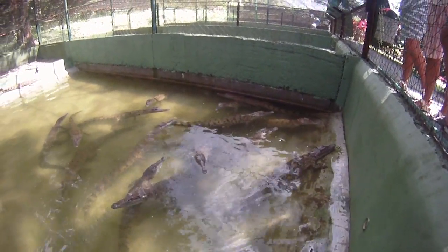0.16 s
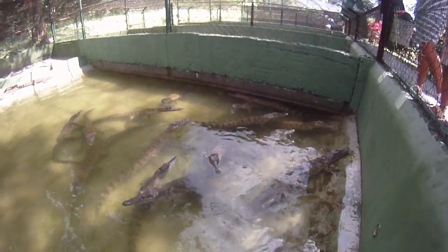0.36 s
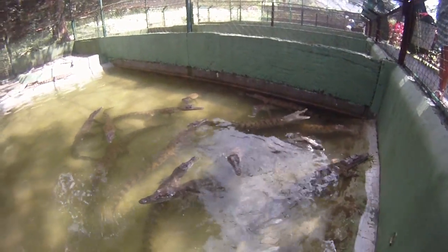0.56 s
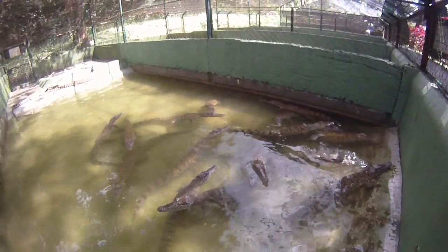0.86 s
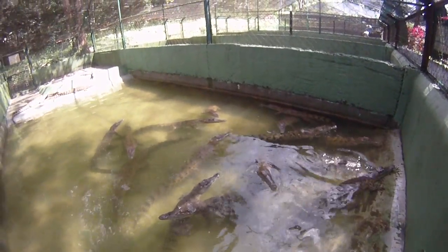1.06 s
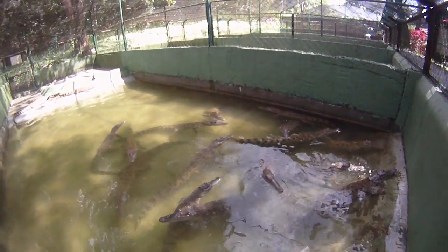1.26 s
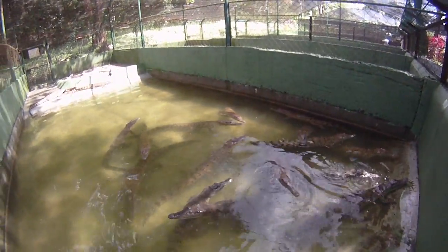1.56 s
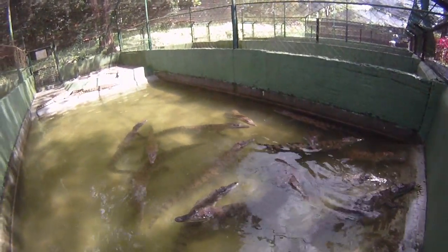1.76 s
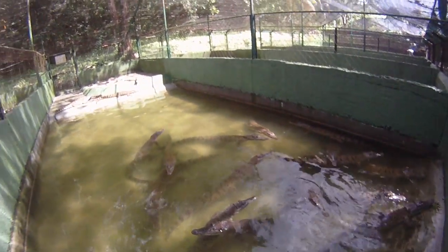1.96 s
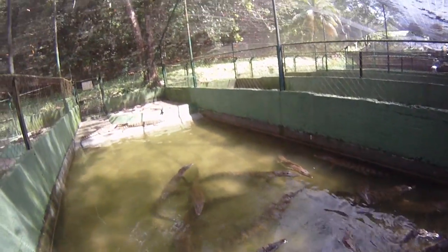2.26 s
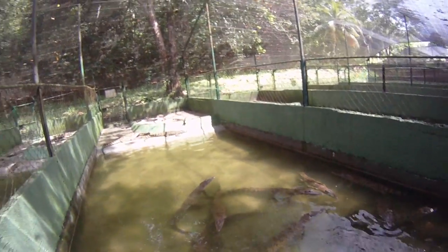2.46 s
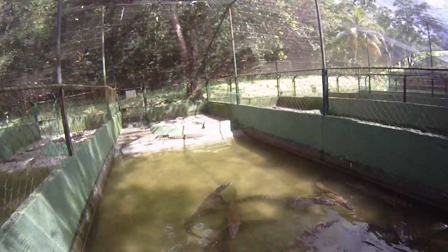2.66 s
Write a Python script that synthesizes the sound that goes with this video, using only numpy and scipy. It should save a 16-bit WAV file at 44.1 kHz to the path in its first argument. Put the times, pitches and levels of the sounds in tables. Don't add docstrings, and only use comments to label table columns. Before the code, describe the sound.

A sharp knock on a small plastic case with a low thump, over steady outdoor hiss

```python
import sys
import numpy as np
from scipy import signal
from scipy.fft import rfft, irfft, next_fast_len
from scipy.io import wavfile
from scipy.ndimage import map_coordinates

SR = 44100
rng = np.random.default_rng(int(sys.argv[2]) if len(sys.argv) > 2 else 0)


def how_loud(loudness_db):
    steps = np.asarray(loudness_db, float) / 20
    return 10 ** steps


def wrap_up_sound(samples):
    columns = np.atleast_2d(samples).T
    tamed = np.clip(columns, -1, 1)
    steps = np.round(tamed * 32767).astype(np.int16)
    wavfile.write(sys.argv[1], SR, steps)


N = 123479

# start_s, level_db, direction
PUSHES = [
    (.2426, -30.3, 1),
    (.2475, -31.6, -1),
    (.2693, -32.6, -1),
]
# start_s, level_db, centre_hz
CONTACTS = [(.2345, -39, 1950), (.2375, -33, 1950), (.2418, -22, 1250), (.2428, -15, 1880),
            (.2445, -31, 2800), (.2450, -39, 3600), (.2440, -44, 4650), (.2462, -21, 2150),
            (.2490, -28, 900), (.2552, -33, 2300), (.2632, -32, 1000), (.2662, -24, 1250),
            (.2672, -31, 2850), (.2680, -41, 4650), (.2685, -40, 3600), (.2694, -25, 1620),
            (.2726, -26, 2350), (.2772, -33, 1900), (.2810, -38, 2300)]
# pitch_hz, level_db, decay_s (to -60 dB), direction at the microphone
POLE_MODES = [(58.8, -3, .7, 1), (169.5, 1.8, .29, 1), (235.1, .8, .31, -1)]
# pitch_hz, level_db, decay_s (to -60 dB)
WALL_MODES = [(724.6, 4, 0.13), (870, 8, 0.14), (1138, 7, 0.052), (1420, -6, 0.041), (1580, -10, 0.044),
              (1727, 3, 0.074), (1983, 14.5, 0.021), (1990, -1, 0.029), (2270, -5, 0.059),
              (2574, 10.5, 0.032), (3750, 6, 0.02)]
# start_s, pitch_hz, level_db, decay_s (to -60 dB)
TICKS = [(.258, 292, -38, .07), (2.45, 232, -55, .25), (2.465, 947, -45, .1), (2.468, 1810, -49, .08),
         (2.47, 1180, -50, .07), (2.465, 720, -53, .08), (2.52, 1150, -52, .12), (2.555, 1550, -53, .2),
         (2.582, 2070, -44, .08), (1.91, 160, -54, .15)]
# time_s, level_db, tilt_db (lower sway over upper sway)
TREMOR = [(0, -58, -15), (.16, -46.5, -3.5), (.5, -52, -1), (.64, -45, -5), (.82, -48.5, -8),
          (.96, -52.5, 3), (1.3, -52.5, -0.5), (1.38, -43.5, -6), (1.52, -49, -5.5), (1.65, -51.5, -0.5),
          (1.9, -47.5, 11), (2.05, -49.5, 0), (2.25, -41, 5), (2.4, -46.5, -2), (2.52, -42.5, -8),
          (2.65, -52.5, -7), (2.8, -43.5, 3)]
# pitch_hz, wander_hz
SWAYS = [(33, 3.34), (58, 2.43)]
# time_s, level_db
SWAY_DIP = [(0, 0), (.235, 0), (.25, -14), (.36, -12), (.46, 0), (2.8, 0)]
# time_s, level_db
RUSTLE = [(0, 5), (.5, 3), (.9, 4.5), (1.2, 3), (1.7, 6), (2.1, 3), (2.5, 5), (2.8, 0)]
# pitch_hz, level_db (per Hz)
RUSTLE_COLOUR = [(44, -34), (75, 1), (91, -13.5), (161, -11.5), (200, -17.5), (322, -20.5), (377, -22.5),
                 (800, -32.5), (1040, -47), (1760, -120)]
# time_s, level_db
AIR = [(0.0, -56.5), (1.0, -54.5), (1.93, -54.5), (2.34, -56.5), (2.8, -57.5)]
# pitch_hz, level_db (per Hz)
AIR_COLOUR = [(400, -18.5), (850, -12.5), (1000, -9), (1700, -8), (2500, -6.5), (2700, -13.5),
              (4000, -20.5), (6000, -21)]
# centre_hz, width_hz, lift_db
CAVITIES = [(1159.4, 138, 8), (1539, 113, 5), (2064, 77, 4.5), (2360, 310, 4), (3150, 100, 4)]
# time_s, first_db, second_db
FLARES = [(0.4, -69, -72), (0.43, -66, -60), (0.83, -61, -61), (0.87, -48.5, -65), (1.17, -63, -68),
          (1.75, -55.5, -55), (2.2, -55.5, -58.5), (2.34, -70, -59), (2.73, -70, -59), (2.8, -57, -66)]
# time_s, level_db
PUMP = [(0, -68), (1.95, -88), (2.15, -69.5), (2.6, -69), (2.75, -86)]
# time_s, level_db
NEAR_CICADA = [(0, -64.5), (.4, -67.5), (.6, -72), (.95, -65.5), (1.3, -69.5), (1.5, -66), (2.1, -70),
               (2.4, -66), (2.8, -69.5)]
# time_s, level_db
FAR_CICADA = [(0, -94), (1.9, -79), (2.25, -67.5), (2.55, -65), (2.8, -72.5)]
# time_s, level_db
THIRD_CICADA = [(0, -88), (1.5, -82), (2.8, -66.5)]
# pitch_hz, level_db (per Hz)
CHORUS_COLOUR = [(5150, -30), (5250, -4.5), (5400, -4.5), (5600, -1), (5850, 1.5), (6000, -12.5)]
# pitch_hz, level_db (per Hz)
SIDE_COLOUR = [(59, -40), (100, -13), (657, -3.5), (1110, -13), (1780, -12), (2360, -17), (3710, -3.5),
               (5410, -12), (9000, -14), (11700, -51), (19800, -120)]


def unit(x):
    return x / np.sqrt(np.mean(x ** 2) + 1e-20)


def along(points, hz):
    point_hz, point_db = np.transpose(points)
    return np.interp(np.log(hz + 1), np.log(point_hz + 1), point_db, -120, -120)


def curves(rows):
    times, *columns = np.transpose(rows)
    return [np.interp(np.arange(N) / SR, times, column) for column in columns]


def wobble(rate):
    points = rng.standard_normal(int(N * rate / SR) + 4)
    return map_coordinates(points, [np.arange(N) * rate / SR])


def filtered(x, response):
    size = next_fast_len(N + SR // 2)
    spectrum = rfft(x, size) * response(np.fft.rfftfreq(size, 1 / SR))
    return irfft(spectrum, size)[..., :N]


def noise(response):
    return unit(filtered(rng.standard_normal(N), response))


def bell(hz, centre_hz, width_hz):
    return 1 / (1 + (2 * (hz - centre_hz) / width_hz) ** 2)


def ring(start_s, hz, db, decay_s, attack_s):
    t = np.clip(np.arange(N) / SR - start_s, 0, None)
    fade = how_loud(db - 60 * t / decay_s)
    swell = 1 - np.exp(-t / attack_s)
    return fade * swell * np.sin(2 * np.pi * hz * t)


def case_colour(hz):
    lift = sum(db * bell(hz, centre, width) for centre, width, db in CAVITIES)
    return how_loud(along(AIR_COLOUR, hz) + lift)


def pole_thump():
    thump = np.zeros(N)
    for start, db, way in PUSHES:
        for hz, level, decay, sense in POLE_MODES:
            thump += way * sense * ring(start, hz, 0.8 + db + level, decay, attack_s=0.0004)
    return thump


def case_clack():
    wall_db, spread_hz, wall_attack_s = -18.5, 630, 0.0048
    rattle_db, rattle_decay_s = -37.5, 0.24
    clack = np.zeros(N)
    rattle = noise(lambda hz: case_colour(hz) * bell(hz, 1200, 4200) * (hz > 600))
    for start, db, centre_hz in CONTACTS:
        clack += ring(start, centre_hz, db, 25 / centre_hz, attack_s=0.001)
        for hz, level, decay in WALL_MODES:
            nearness = bell(hz, centre_hz, spread_hz)
            clack += nearness * ring(start, hz, db + wall_db + level, decay, wall_attack_s)
        t = np.arange(N) / SR - start
        clack += (t > 0) * how_loud(db + rattle_db - 60 * np.abs(t) / rattle_decay_s) * rattle
    high_pass = signal.butter(4, 620, "high", fs=SR, output="sos")
    return signal.sosfilt(high_pass, clack)


def knock():
    ticks = sum(ring(start, hz, db, decay, attack_s=0.006) for start, hz, db, decay in TICKS)
    return pole_thump() + case_clack() + ticks


def sway(hz, wander_hz):
    cycles = np.cumsum(hz + wander_hz * wobble(18)) / SR
    return how_loud(2.7 * wobble(16)) * np.sin(2 * np.pi * cycles)


def tremor():
    level_db, tilt_db = curves(TREMOR)
    dip_db, = curves(SWAY_DIP)
    rustle_db, = curves(RUSTLE)
    low, high = [sway(hz, wander) for hz, wander in SWAYS]
    sways = how_loud(tilt_db / 2) * low + how_loud(-tilt_db / 2) * high
    rustle = noise(lambda hz: how_loud(along(RUSTLE_COLOUR, hz)))
    rustle = how_loud(-62 + rustle_db + 0.91 * wobble(12)) * rustle
    return how_loud(level_db - 0.5 + dip_db) * sways + rustle


def air():
    level_db, = curves(AIR)
    flares = np.zeros(N)
    for flare_db, (centre, width, _) in zip(curves(FLARES), CAVITIES):
        flares += how_loud(flare_db - 7.5) * noise(lambda hz: bell(hz, centre, 0.96 * width))
    return how_loud(level_db + 0.63 * wobble(26)) * noise(case_colour) + flares


def pump():
    hum_hz = 328
    level_db, = curves(PUMP)
    return how_loud(level_db) * noise(lambda hz: bell(hz, hum_hz, 4.7) + 0.57 * bell(hz, hum_hz / 2, 1.7))


def cicada(rows, tone_hz, rate_hz, depth, drift):
    level_db, = curves(rows)
    clicks = np.cumsum(rate_hz + 0.89 * wobble(3.86)) / SR
    beat = np.exp(depth * np.cos(2 * np.pi * clicks))
    cycles = np.cumsum(tone_hz + 2.427 * wobble(1.5)) / SR
    tone = np.sin(2 * np.pi * cycles + drift * wobble(40))
    return how_loud(level_db + 0.76 * wobble(25.14)) * unit(beat * tone)


def chorus():
    pulses = np.cumsum(52 + 4 * wobble(3)) / SR
    buzz = how_loud(2.5 * np.cos(2 * np.pi * pulses) + 1.05 * wobble(120))
    hiss = noise(lambda hz: how_loud(along(CHORUS_COLOUR, hz)))
    return how_loud(-66.5 + 0.27 * wobble(1.36)) * unit(buzz * hiss)


def insects():
    near = cicada(NEAR_CICADA, 5512, 153, depth=0.8, drift=0.3)
    far = cicada(FAR_CICADA, 5823, 145, depth=0.9, drift=0.4)
    third = cicada(THIRD_CICADA, 5702, 121, depth=1.4, drift=0.3)
    return near + far + third + chorus()


def scene():
    mono = knock() + tremor() + air() + pump() + insects()
    return np.tile(mono, (2, 1))


def roll_off(x):
    return signal.sosfilt(signal.butter(12, 15700, fs=SR, output="sos"), x)


def record(dry):
    hold_hz, top_hz = 12000, 15280
    carrier = 1 - 2 * np.sin(2 * np.pi * hold_hz * np.arange(N) / SR)
    sampled = filtered(dry, lambda hz: hz < hold_hz / 2) * carrier
    held = filtered(sampled, lambda hz: np.sinc(hz / hold_hz) * (hz < top_hz))
    side = how_loud(-80.5) * noise(lambda hz: how_loud(along(SIDE_COLOUR, hz)))
    return roll_off(held + [side, -side])


dry = scene()
out = record(dry)
wrap_up_sound(out)
```